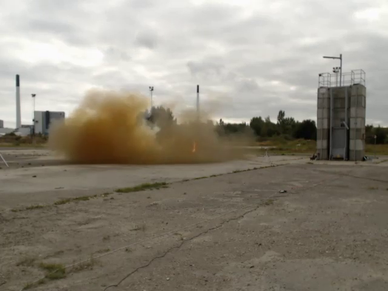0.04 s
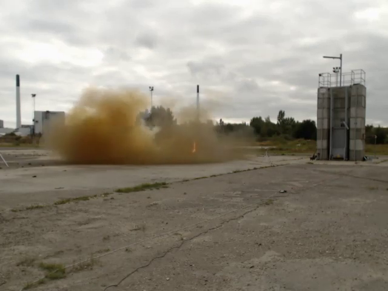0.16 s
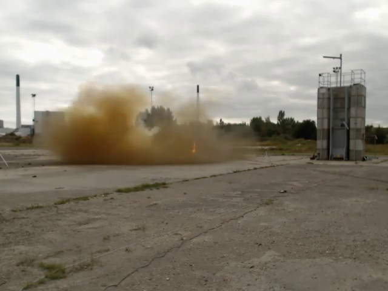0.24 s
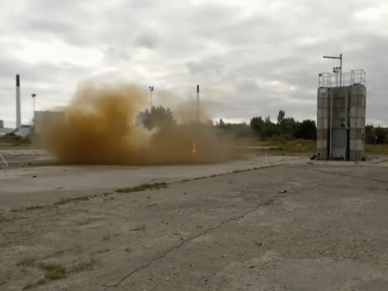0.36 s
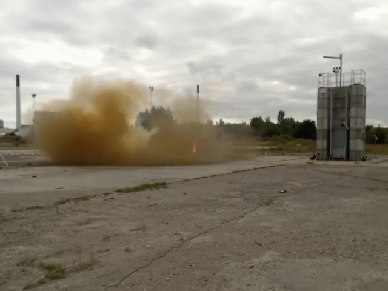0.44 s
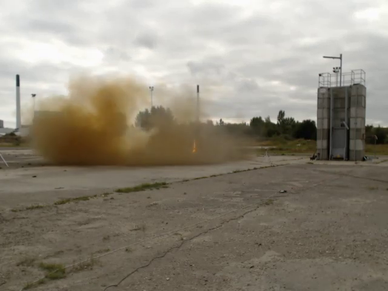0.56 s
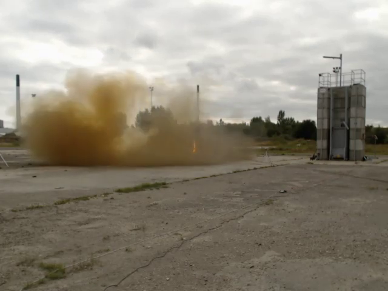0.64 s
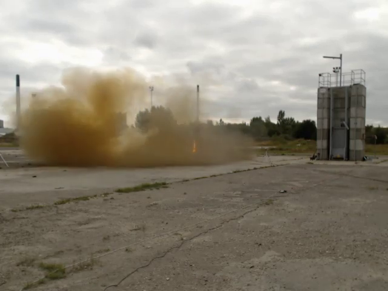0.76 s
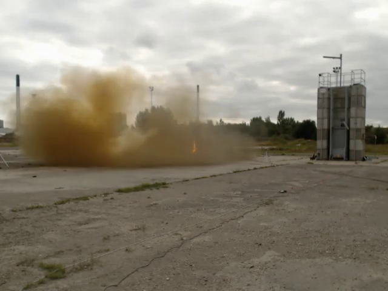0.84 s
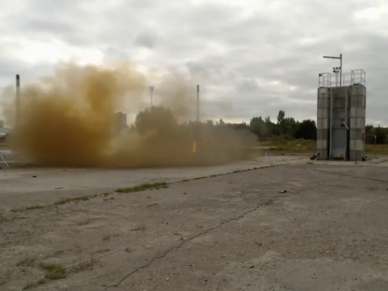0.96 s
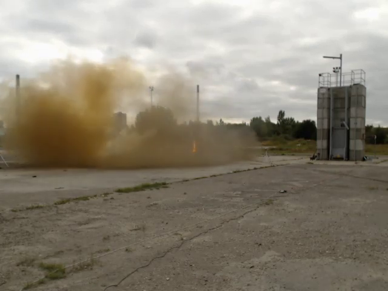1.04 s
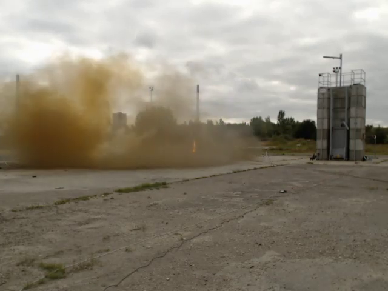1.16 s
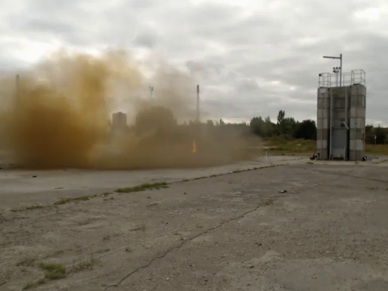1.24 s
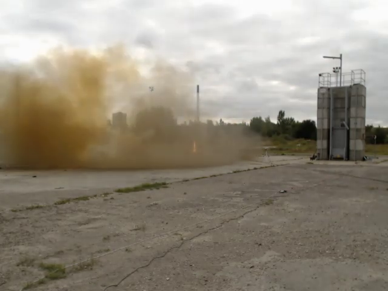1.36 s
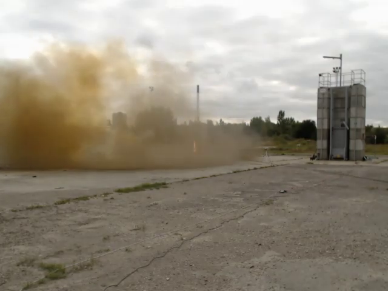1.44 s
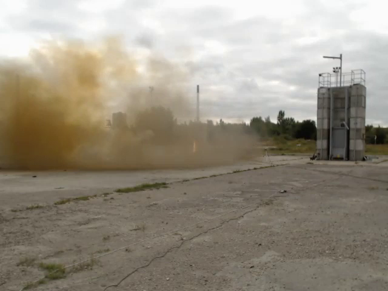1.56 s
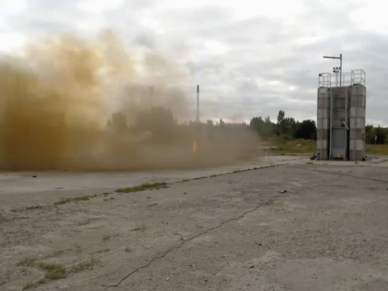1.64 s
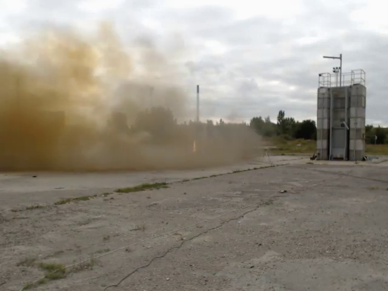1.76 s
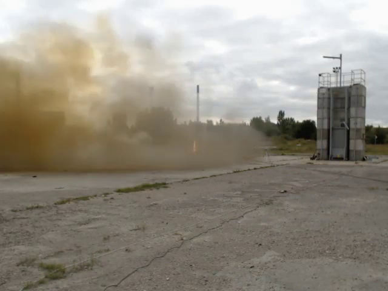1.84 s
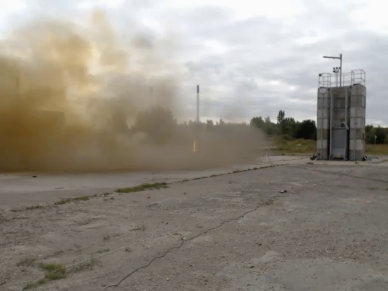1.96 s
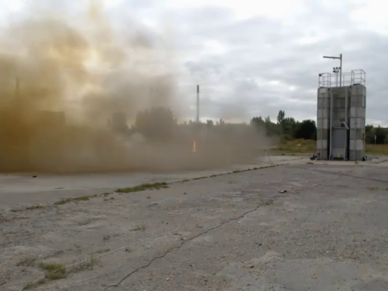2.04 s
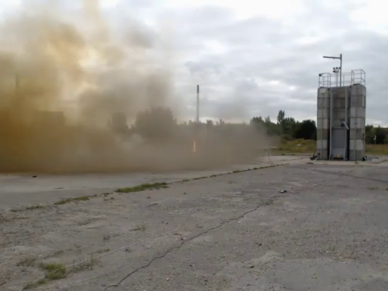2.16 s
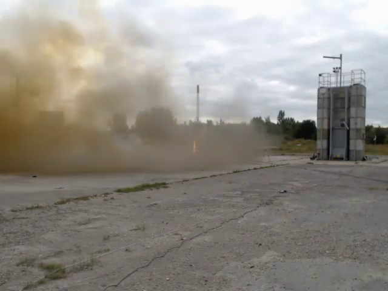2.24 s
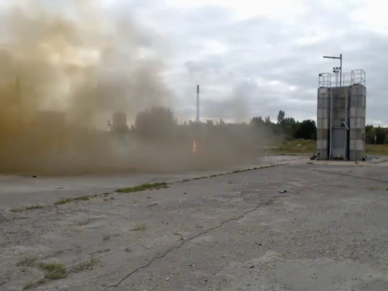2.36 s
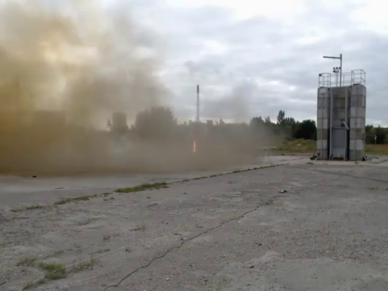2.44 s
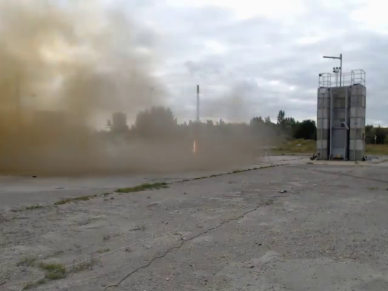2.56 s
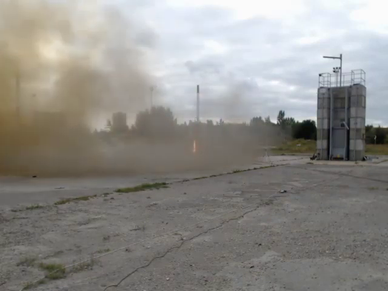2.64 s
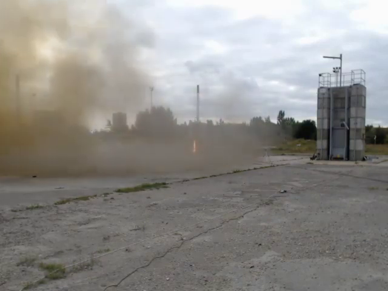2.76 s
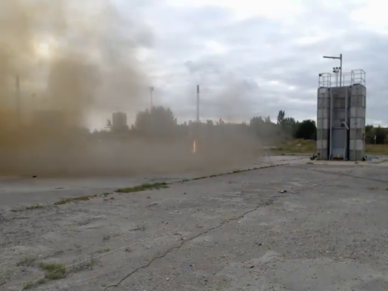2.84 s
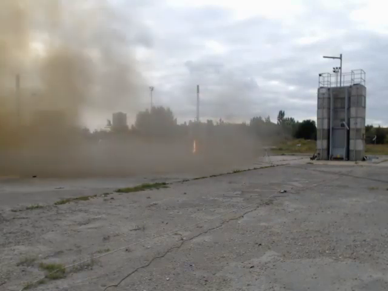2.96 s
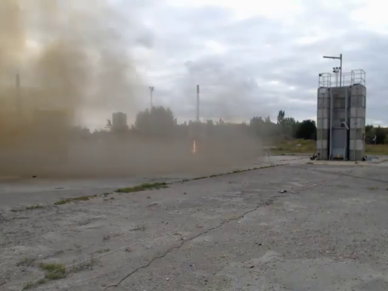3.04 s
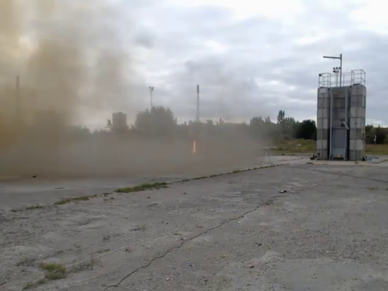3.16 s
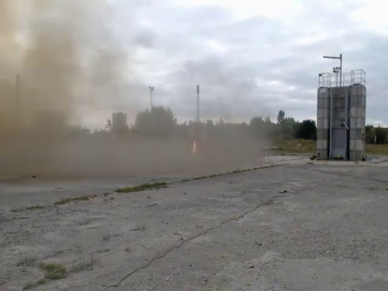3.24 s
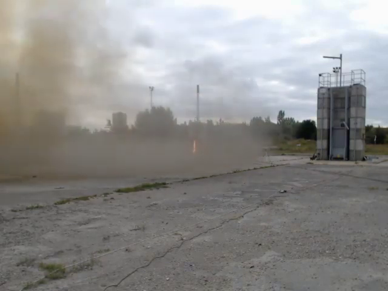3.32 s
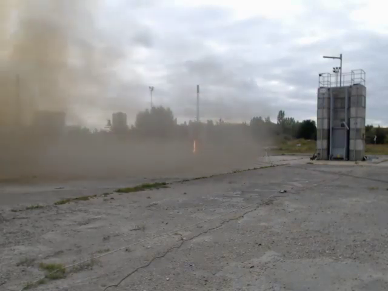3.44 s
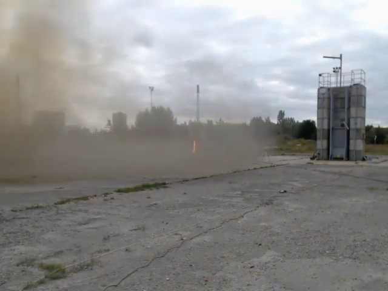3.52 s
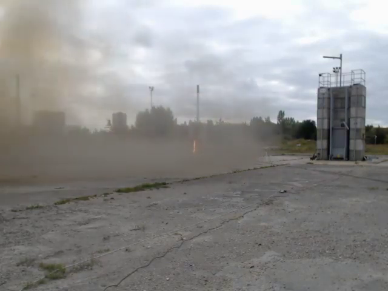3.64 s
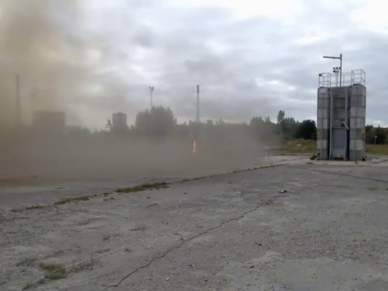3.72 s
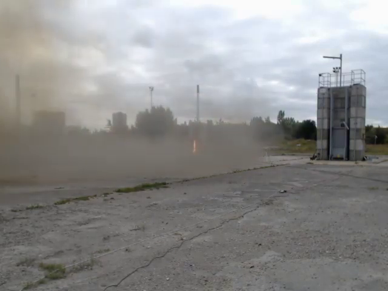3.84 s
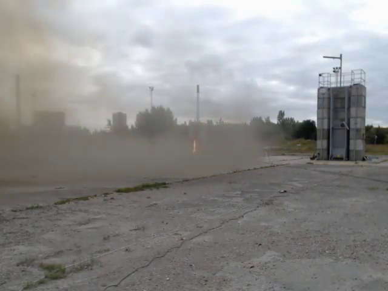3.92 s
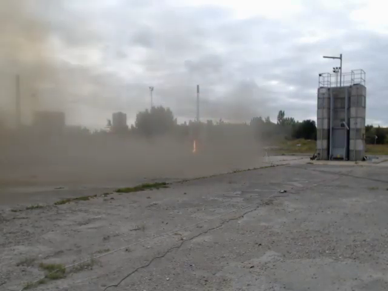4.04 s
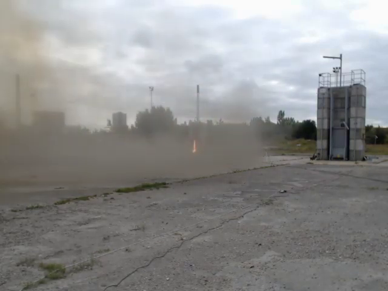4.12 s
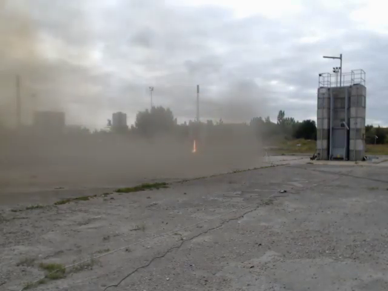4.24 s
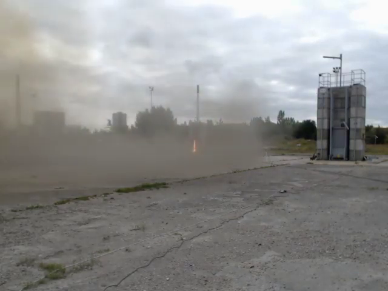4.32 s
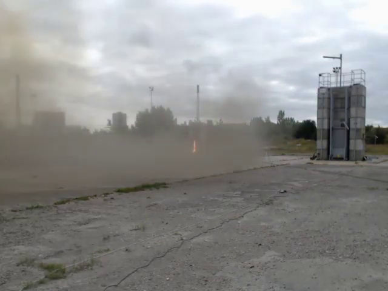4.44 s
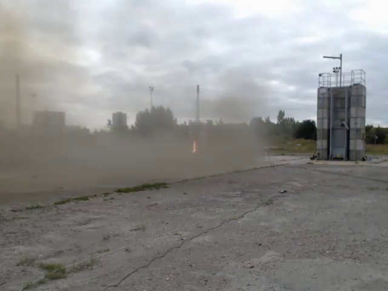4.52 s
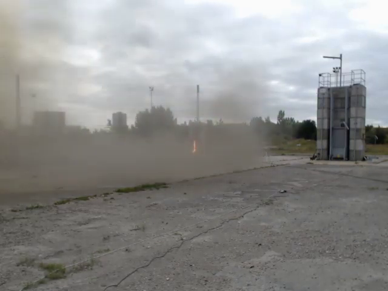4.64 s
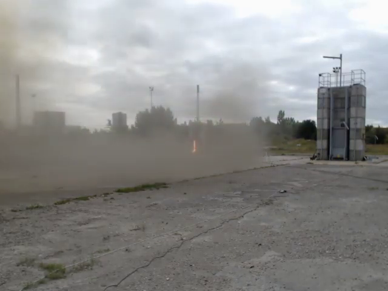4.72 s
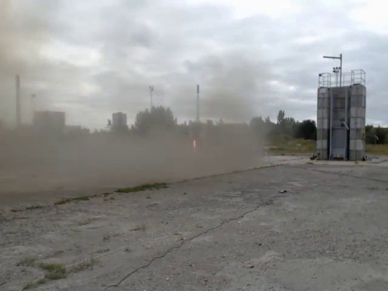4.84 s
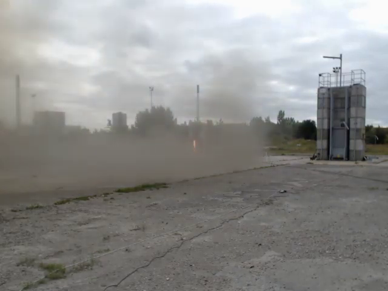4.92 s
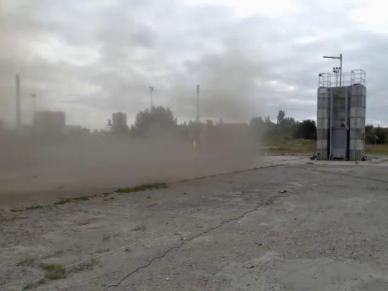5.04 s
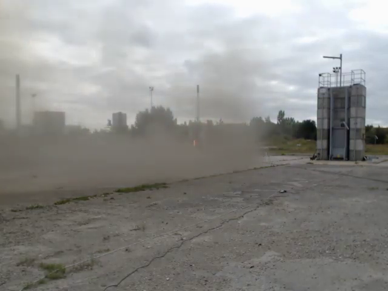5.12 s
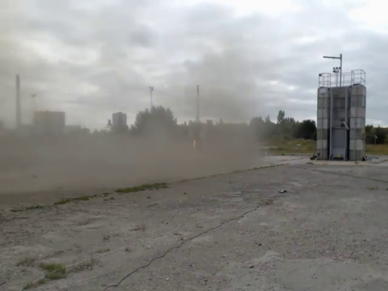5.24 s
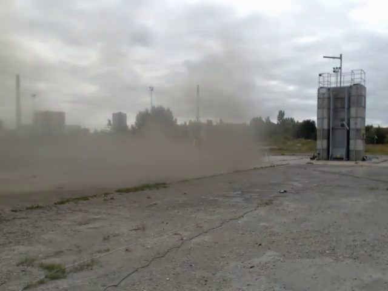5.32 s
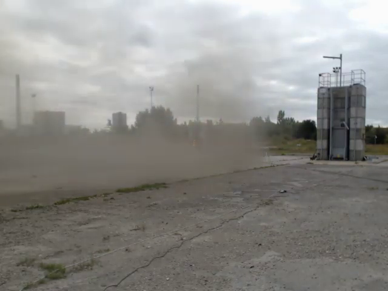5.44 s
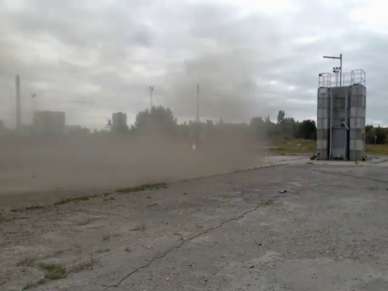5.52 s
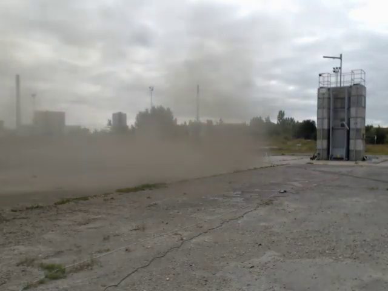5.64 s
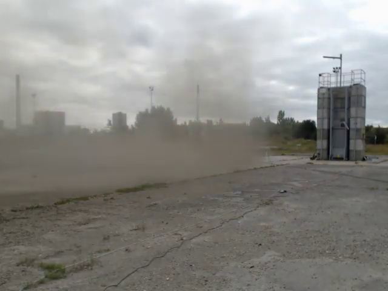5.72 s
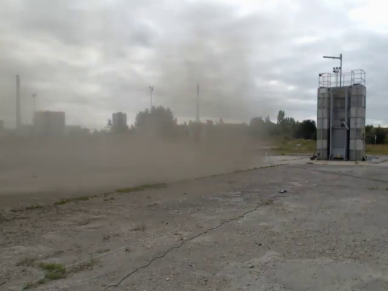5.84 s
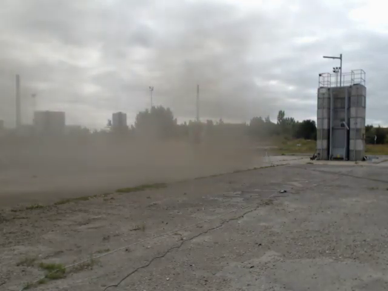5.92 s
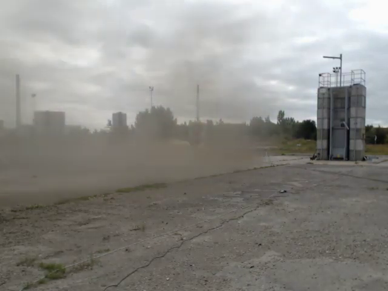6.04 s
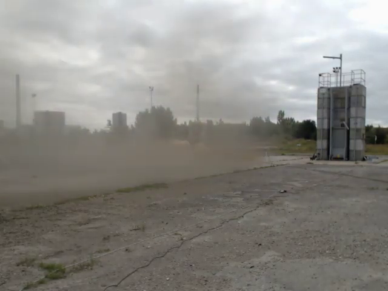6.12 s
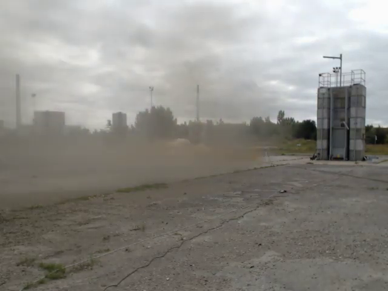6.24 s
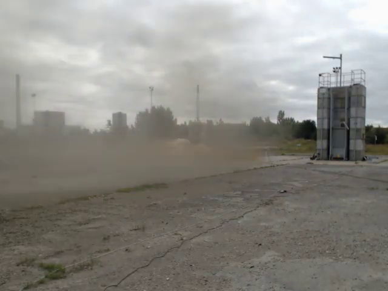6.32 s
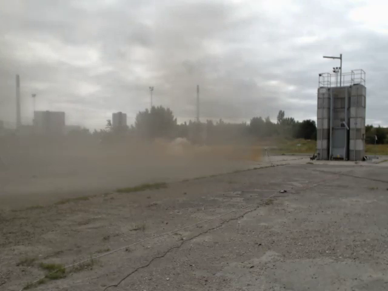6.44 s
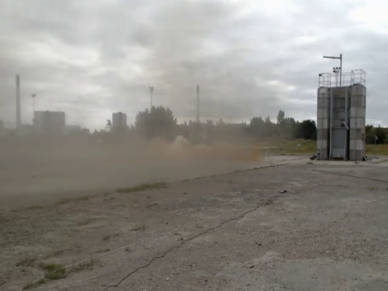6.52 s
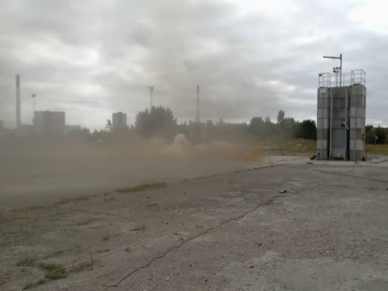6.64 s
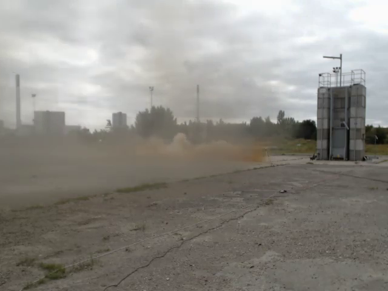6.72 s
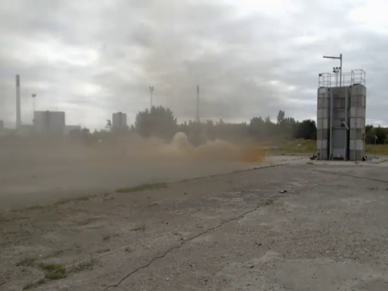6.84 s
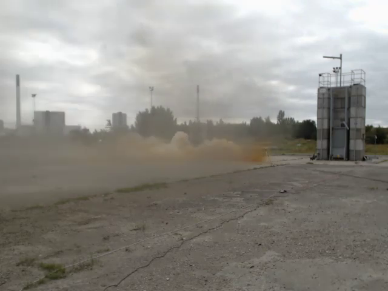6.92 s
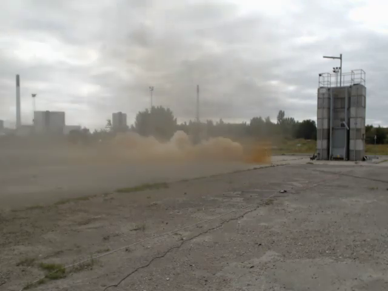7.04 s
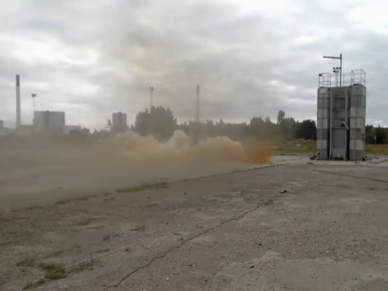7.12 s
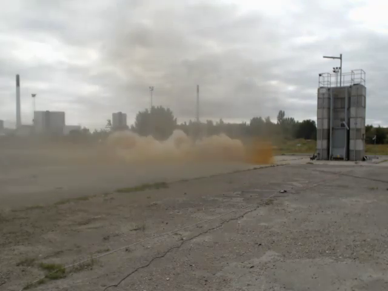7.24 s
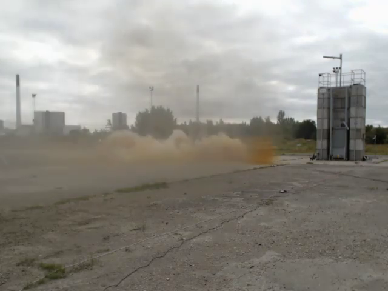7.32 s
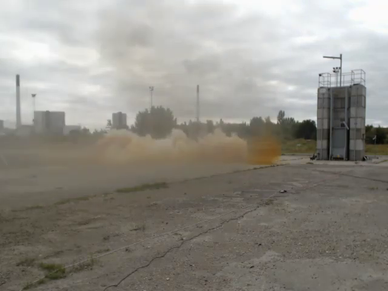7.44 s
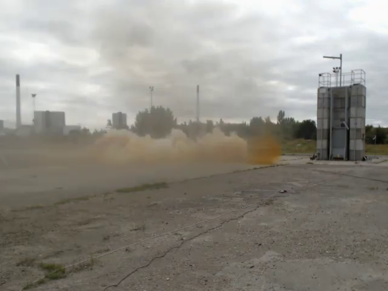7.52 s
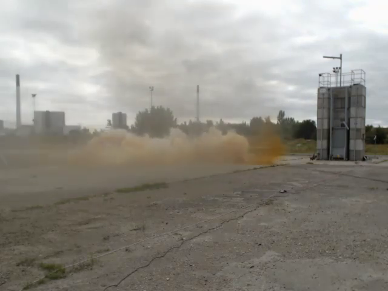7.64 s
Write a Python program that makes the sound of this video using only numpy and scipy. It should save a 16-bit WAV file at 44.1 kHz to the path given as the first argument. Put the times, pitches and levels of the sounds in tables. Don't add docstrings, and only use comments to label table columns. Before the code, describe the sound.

Outdoors, a test-stand rocket blasts dense, continuous noise from the first instant, strong in both low-mid roar and bright hiss. The small camera clips and levels it, leaving the treble patchy and mottled. Hot air makes the tone swirl and flicker, mostly in the first three seconds. The roar then declines smoothly to a quiet, duller rush, with soft evenly spaced ticks. Nearly mono.

```python
import sys
import numpy as np
from scipy import signal
from scipy.fft import rfft, irfft
from scipy.io import wavfile
from scipy.ndimage import uniform_filter1d

SR = 44100
rng = np.random.default_rng(int(sys.argv[2]) if len(sys.argv) > 2 else 0)


def transcribe(u):
    v = np.clip(np.atleast_2d(u).T, -1, 1)
    q = np.round(v * 32767).astype(np.int16)
    wavfile.write(sys.argv[1], SR, q)


N = 338247
FRAME, HOP = 1024, 256

# time_s [s], level_db [dB], treble_loss [dB per octave]
FADE_DUST = [(0, -10, -1.5), (.7, -10.5, -4), (1.25, -10.5, -1.5), (1.44, -12, 1), (1.58, -11.5, 1),
             (2.11, -13, 2.5), (2.65, -14.5, -0.5), (2.82, -16, -1), (3.3, -17.5, 0), (3.42, -16.5, 0.5),
             (3.55, -17.5, 0), (4.55, -21.5, -1), (5.9, -24, 0), (6.55, -25, 0.5), (7.15, -27, 2),
             (7.35, -29, 2), (7.67, -31.5, 3.3)]
# pitch_hz [Hz], level_db [dB per Hz]
JET_SPECTRUM = [(24, -68), (40, -46), (69, -22.5), (154, -6), (202, -5.5), (294, -5), (472, -8.5),
                (576, -11), (1160, -7.5), (1380, -8.5), (2300, -6), (2760, -1.5), (3740, -2), (8100, -13),
                (15500, -29)]
# centre_s [s], pitch_hz [Hz], gain_db [dB], length_s [s]
BROAD = [(0.087, 358, 4.5, 2.6), (0.21, 470, 7, 0.67), (0.39, 1020, 3, 1), (0.44, 143, -27, 0.8),
         (0.49, 610, 3.5, 0.4), (0.874, 240, 9.5, 0.42), (1.516, 676, 4.5, 0.17), (1.558, 4520, 2.5, 1.03),
         (2.2, 1700, 2, 1.1), (1.93, 446, -2, 0.51), (2.09, 180, 6, 2.4), (2.24, 6500, -1, 0.074),
         (2.318, 8000, 0.5, 0.08), (2.496, 337, 7.5, 0.28), (2.832, 430, -5, 0.062), (3.02, 139, 7, 0.61),
         (3.83, 590, 3.5, 1.5), (4.95, 142, 7, 2.1), (5.22, 3570, 1.5, 0.68), (6.05, 554, -4, 0.41),
         (6.3, 111, -16, 0.25), (6.92, 6960, 2.5, 0.97), (7.64, 373, 6, 1.6), (7.66, 684, 4, 0.6)]
# centre_s [s], pitch_hz [Hz], gain_db [dB], length_s [s]
POCKET = [(0.93, 8200, -3, 1), (1.198, 133, -19, 0.21), (1.764, 182, 5, 0.19), (2.58, 570, -4, 0.16),
          (2.74, 110, 4, 0.3), (2.74, 1570, -0.5, 0.16), (2.77, 170, 6, 0.19), (2.94, 294, 6, 0.48),
          (3.553, 2720, -2, 0.19), (3.58, 1400, 3.0, 0.099), (3.61, 400, 4.5, 0.18), (3.68, 230, -8, 0.5),
          (3.75, 830, -5, 0.18), (4.34, 1080, -2.5, 0.18), (4.37, 150, 5, 0.28), (4.9, 1810, -2.0, 0.3),
          (5.08, 1050, -7, 0.12), (5.29, 430, 5.5, 0.41), (5.8, 1520, -7, 0.18), (6.27, 120, -5.5, 0.3)]
# centre_s [s], pitch_hz [Hz], gain_db [dB], length_s [s]
WISP = [(0.0, 3440, 1, 0.06), (0.0, 3490, 1.5, 0.06), (0.0, 6170, -4, 0.08), (0.03, 2120, -4, 0.09),
        (0.08, 1370, -5.2, 0.15), (0.35, 2900, -3.7, 0.13), (0.46, 3890, 1.5, 0.13), (0.71, 8980, -5, 0.16),
        (0.89, 2750, -1.5, 0.2), (0.98, 2000, -2, 0.12), (1.16, 5660, -6, 0.092), (1.2, 2940, -3, 0.08),
        (1.27, 3390, 2, 0.08), (1.32, 6170, -3.1, 0.16), (1.59, 3920, 1.5, 0.08), (1.61, 3340, 1, 0.13),
        (1.7, 2380, -2.8, 0.1), (1.92, 1830, -5, 0.08), (2.05, 3270, 1.5, 0.13), (2.28, 3110, 3, 0.09),
        (2.32, 1850, -1, 0.13), (2.33, 220, -10, 0.1), (2.44, 1500, -4, 0.16), (2.53, 4900, -2, 0.1),
        (2.67, 1700, -3.6, 0.093), (2.72, 1500, -3, 0.1), (2.91, 2450, 1.5, 0.13), (3.11, 3080, 4, 0.09),
        (3.25, 1330, -3.9, 0.12), (3.5, 2380, -1, 0.17), (3.82, 2690, 3.2, 0.12), (4.27, 3020, 2, 0.07),
        (4.48, 2940, 0, 0.09), (4.64, 3810, 3.0, 0.11), (5.39, 3810, 4, 0.09), (5.56, 2770, -3.4, 0.074),
        (5.89, 3300, -1, 0.17), (6.07, 5500, 3, 0.11), (6.25, 2690, -4, 0.11), (6.84, 3110, 2, 0.08),
        (6.93, 3600, -2.8, 0.1), (7.24, 2380, 4, 0.11), (7.38, 2400, 2, 0.19), (7.42, 3390, -4.2, 0.1),
        (7.67, 1430, 8, 0.08)]
# pitch_hz [Hz], width [octaves], gain_db [dB]
BODY = [
    (905, 0.68, 4),
    (1366, 0.14, 5),
    (1825, 0.34, 2.5),
    (2940, 0.59, 1),
    (3800, 0.11, 1),
]
# centre_s [s], pitch_hz [Hz], gain_db [dB], length_s [s], glide [octaves per s]
DRIFT = [(0.28, 1190, 6, 0.4, 1.3), (0.3, 8480, 1.5, 0.66, 1.5), (0.43, 680, 5.0, 0.54, 0.4),
         (0.52, 2570, -5, 0.13, -3), (0.53, 910, 7, 0.64, 0.5), (0.88, 1830, 6, 0.27, 0),
         (1.16, 2400, -5.5, 0.11, 2.5), (1.19, 3360, 2, 0.4, -2), (1.25, 810, -5, 0.81, 0.5),
         (1.4, 6600, 9, 0.05, 2), (1.51, 1330, 7, 0.046, 1), (1.51, 2240, -9, 0.066, -3),
         (1.58, 2740, 6.0, 0.074, -2), (1.67, 4300, 3.5, 0.1, -3), (1.91, 1490, 6.5, 0.4, 0.5),
         (2.32, 1050, 13, 0.082, -2.5), (2.44, 3400, -4.5, 0.46, 0.7), (2.56, 1470, 10, 0.11, -0.5),
         (2.66, 2720, 7, 0.13, -2.5), (2.86, 1300, 4.5, 0.17, 4.5), (3.12, 1330, 8, 0.041, -3),
         (3.47, 1890, -3.5, 0.4, 0), (3.6, 1100, -8, 0.34, 1.1), (3.6, 2940, 3.5, 0.53, 0.5),
         (3.84, 4130, -3, 0.4, -0.5), (4.61, 1460, 4.5, 0.16, 2), (5.34, 1130, -3, 0.55, 0),
         (5.89, 935, 6, 0.39, 2), (6.13, 2180, 6, 0.25, 0), (6.49, 7550, 3, 0.27, 2.5),
         (6.63, 6600, 2.5, 0.6, 0), (6.66, 1180, 3.5, 0.29, -0.5), (7.21, 1040, 6.0, 0.36, 0.5),
         (7.27, 7600, 3.5, 0.4, -1.5), (7.48, 2650, 5, 0.15, 3), (7.53, 670, 4.5, 0.33, 0),
         (7.6, 4360, 2.5, 0.07, -1.5)]
# centre_s [s], pitch_hz [Hz], gain_db
# [dB], length_s [s], glide [octaves per s]
GLINT = [(0.47, 4670, 5.5, 0.2, -0.14), (0.59, 3500, 4.5, 0.097, -0.22), (0.7, 2380, 4, 0.073, 0.7),
         (0.75, 7250, 5.5, 0.092, -0.7), (0.86, 3460, -3.5, 0.37, -0.11), (0.91, 1320, 13, 0.11, 0),
         (1.03, 5240, 5, 0.17, 0.36), (1.06, 600, -18, 0.33, 0.59), (1.11, 1940, 11, 0.08, 0.7),
         (1.16, 1830, -10, 0.05, 0.7), (1.17, 1190, -2.5, 0.98, -0.7), (1.28, 1740, 8.5, 0.18, 0.12),
         (1.31, 2620, 5, 0.11, -0.19), (1.39, 3570, -15, 0.056, 0), (1.43, 8200, -1, 0.9, 0),
         (1.5, 1060, 11, 0.043, 0), (1.51, 1730, -3, 0.27, 1.1), (1.69, 3040, -6, 0.08, 0),
         (1.73, 7340, 4.0, 0.08, -1.5), (1.79, 1285, 12, 0.06, 0.34), (1.8, 2160, 13, 0.096, 1.7),
         (1.83, 990, -2, 0.33, 0), (1.88, 3630, 5, 0.063, 0), (1.92, 3000, -4, 0.49, -0.62),
         (1.93, 4030, -10, 0.064, 0), (1.96, 2750, 9, 0.1, -0.15), (1.99, 2380, 10, 0.16, -1.8),
         (2.0, 5500, -1, 0.12, 0), (2.03, 3560, 2, 0.049, 0.13), (2.11, 1960, 5.5, 0.062, -0.14),
         (2.21, 2450, -7, 0.16, 1.3), (2.21, 4000, 4.5, 0.22, -0.28), (2.26, 1590, -8, 0.27, 1.1),
         (2.29, 1900, 7.5, 0.074, 0), (2.31, 2380, 9, 0.05, 0), (2.39, 770, 9, 0.05, 0),
         (2.45, 1800, 9, 0.05, 0), (2.47, 2610, 10.5, 0.077, 0.5), (2.55, 1010, -8, 0.34, -1.1),
         (2.89, 2500, 5, 0.065, -1.5),
         (2.99, 8230, 1.5, 0.4, 3), (3.06, 6130, 2, 0.44, 2), (3.413, 3270, 7, 0.11, 3.5),
              (3.6, 1630, 6, 0.063, 2), (3.77, 1610, -4, 0.18, -3), (3.79, 2090, 7, 0.05, 4),
              (3.81, 5500, 3.5, 0.2, -1.5), (3.96, 980, 10, 0.071, 3), (3.975, 680, 6.5, 0.18, -0.5),
              (3.995, 2550, 8, 0.043, 6), (4.09, 1350, 2, 0.18, -2), (4.46, 920, 6, 0.12, 1),
              (4.48, 3740, 4, 0.27, -0.5), (4.86, 1950, 6.5, 0.27, 0), (5.227, 1950, -5, 0.35, 2),
              (5.6, 820, 2.5, 0.34, 0), (5.95, 1300, 7, 0.12, -4), (5.98, 4120, -4.0, 0.19, 0),
              (6.03, 5820, -2, 0.6, 0.7), (6.2, 1360, -9, 0.72, 1), (6.22, 4120, 3, 0.08, 0),
              (6.3, 1700, 5, 0.14, -1), (6.35, 5340, 6, 0.12, -3.5), (6.51, 2770, -5, 0.55, 0.5),
              (6.53, 2980, 8, 0.05, 0), (6.57, 1830, -3, 0.18, -1), (6.67, 5400, 2, 0.4, 0),
              (6.68, 3780, -2, 0.34, 0), (6.7, 2060, 6, 0.13, -2), (6.7, 6920, -6.5, 0.073, 4),
              (6.77, 1590, 8, 0.19, -0.7), (6.98, 2160, 5.5, 0.56, -0.5), (7.2, 3320, 5, 0.11, -1),
              (7.22, 1330, -8.0, 0.12, -1), (7.3, 5660, 5, 0.18, -0.7), (7.31, 1730, 8, 0.2, 0),
              (7.5, 2000, 4, 0.39, -1), (7.53, 2800, 3, 0.12, 2), (7.62, 8480, -5, 0.18, -2),
         (2.36, 980, 5, 0.11, -2),
    (6.5, 4200, -1, .1, 0),
    (7.1, 7900, 1, 1.1, 0.5),
    (7, 9100, -1, 1.1, -0.5),
]
# centre_s [s], pitch_hz [Hz], gain_db [dB], length_s [s], glide [octaves per s]
FLICKER = [(0.91, 2260, 7, 0.06, 2), (0.93, 2800, 8, 0.065, 0), (1.08, 3420, 4, 0.09, -2),
           (1.3, 5280, -6, 0.09, 2), (1.46, 5590, -2, 0.2, 2), (1.56, 1710, 8, 0.04, -2),
           (1.59, 2220, 10, 0.04, -2), (1.66, 1570, -12, 0.06, -2), (1.67, 5590, 7, 0.04, -2),
           (1.7, 2090, -5, 0.04, -2), (1.71, 3720, 6, 0.065, 0), (1.73, 2490, 9, 0.04, -2),
           (1.76, 1670, 8.5, 0.085, 0.22), (1.82, 5430, 7, 0.078, -2), (1.85, 2280, 4, 0.04, -2),
           (1.86, 4070, 3, 0.04, -2), (1.92, 1610, -14, 0.06, 0), (1.96, 2030, -6, 0.2, -2),
           (1.98, 2160, 6.0, 0.04, -2), (1.99, 1700, 8, 0.044, -2), (2.03, 4310, 5, 0.04, 0),
           (2.17, 3100, 3.0, 0.14, -1.8), (2.19, 5430, 7, 0.04, 2), (2.3, 4190, -6.5, 0.035, 2),
           (2.34, 3840, 8, 0.04, 2), (2.38, 1520, 6, 0.033, -2), (2.42, 2300, 8, 0.04, 0),
           (2.42, 3230, 7, 0.037, -2), (2.47, 2900, 5, 0.09, 0.22), (2.54, 1730, 6, 0.04, 0),
           (2.57, 2160, -5, 0.14, 0), (2.61, 3360, 7, 0.04, 2), (2.67, 3750, -3.0, 0.2, -1.5),
           (2.68, 2420, 3.5, 0.06, 2), (2.69, 4840, 7, 0.04, -2), (2.81, 1660, 5.0, 0.06, -2),
           (2.81, 3320, 6, 0.04, 2), (2.83, 2220, -9, 0.09, -2)]
# time_s [s], push [ratio], turbulence_depth [ratio]
PUSH = [
    (0, .8, .7),
    (1, .7, 1.2),
    (2.7, .5, 1.2),
    (3.6, .7, .6),
    (6.2, .7, .6),
    (7, .42, .7),
    (7.67, .1, .7),
]
# pitch_hz [Hz], level_db [dB re frame mean]
TREBLE_FLOOR = [
    (7000, -30),
    (9000, -24),
    (12000, -22),
    (15500, -31),
]
# pitch_hz [Hz], level_db [dB re its own band]
GRAIN_FLOOR = [
    (7000, -10.5),
    (9000, -4.4),
    (11500, -.7),
    (15500, .2),
]
THUMP_DB = [6, 7, 4.5, 8, 2, 3, -14, -2, -11, -3, -2, -4, -4, -6, -7, -3, -5, -13, -17, -26, -1, -1, -6,
            -12, 1, -15, -8]
# centre_s [s], low_hz [Hz], high_hz [Hz]
SPLIT = [(0.689, 8930, 10360), (0.803, 5670, 6700), (1.574, 9620, 11010), (2.177, 12360, 15600),
         (2.802, 5700, 6960), (3.036, 4280, 5800), (3.477, 5200, 6310), (3.641, 6260, 7650),
         (3.894, 4260, 6180), (3.94, 5200, 6960), (4.034, 8330, 9800), (4.124, 12460, 13890),
         (4.245, 11730, 13160), (4.265, 4670, 5800), (4.267, 8970, 10410), (4.405, 4710, 6400),
         (4.497, 6910, 7700), (4.544, 7200, 8940), (4.567, 8970, 10360), (4.801, 6860, 8290),
         (4.847, 8500, 9720), (5.24, 9020, 10490), (5.334, 4750, 9590), (5.403, 6910, 8290),
         (5.615, 8930, 9890), (5.75, 14400, 15600), (5.96, 5130, 6370), (6.468, 9150, 10450),
         (7.33, 6220, 7690)]

BROAD_OCT, POCKET_OCT, WISP_OCT = 0.71, 0.46, 0.17
DRIFT_OCT, GLINT_OCT, FLICKER_OCT = 0.35, 0.15, 0.11
BROAD_GAIN, WISP_GAIN = 1.03, 1.1
DRIFT_GAIN, GLINT_GAIN, FLICKER_GAIN = 1.16, 1.12, 1.22
DUST_FROM_HZ = 3430
RUMBLE_HZ, RUMBLE_OCT = 240, 3.35
SHADOW_S, SHADOW_SPAN_S, SHADOW_DB = 0.75, 2.8, -7
LINGER_S, LINGER_SPAN_S, LINGER_DB = 7.12, 1.55, 5.5
FLUTTER_HZ, FLUTTER_OCT, FLUTTER_DB = 3180, 0.62, 1.55
TOP_HZ, TOP_OCT, TOP_LOSS_DB, TOP_LOSS_S = 15500, 0.4, -5, 1.9
DRIVE_START, DRIVE_REST, DRIVE_FALL_S = 1.7, 0.49, 0.92
SEAM_FIRST, SEAM_EVERY = 9464, 12288


def undb(db):
    return 10 ** (np.asarray(db) / 20)


def bell(x, width):
    return np.exp(-4 * np.log(2) * (x / width) ** 2)


def slow_rms(x, span_s):
    return np.sqrt(uniform_filter1d(x ** 2, int(span_s * SR)) + 1e-12)


def shimmer(s, octave, span_s, span_oct):
    rows_per_octave, lowest_octave = 8, 3
    field = rng.standard_normal((96, len(s)))
    for _ in range(2):
        field = uniform_filter1d(field, max(int(span_s * SR / HOP), 1), axis=1)
        field = uniform_filter1d(field, max(int(span_oct * rows_per_octave), 1), axis=0)
    rows = np.clip((octave - lowest_octave) * rows_per_octave, 0, 94.99)
    low = rows.astype(int)
    part = (rows % 1)[:, None]
    return ((1 - part) * field[low] + part * field[low + 1]) / field.std()


def jet(length):
    hz, s, z = signal.stft(rng.standard_normal(length), SR, nperseg=FRAME, noverlap=FRAME - HOP)
    octave = np.log2(np.maximum(hz, 10))
    spectrum_hz, spectrum_db = np.transpose(JET_SPECTRUM)
    db = np.interp(octave, np.log2(spectrum_hz), spectrum_db)[:, None] + 0 * s

    fade_s, _, dust_db = np.transpose(FADE_DUST)
    octaves_in_dust = np.maximum(octave - np.log2(DUST_FROM_HZ), 0)
    db -= np.outer(octaves_in_dust, np.interp(s, fade_s, dust_db))

    rumble_db = SHADOW_DB * bell(s - SHADOW_S, SHADOW_SPAN_S)
    rumble_db += LINGER_DB * bell(s - LINGER_S, LINGER_SPAN_S)
    db += np.outer(bell(octave - np.log2(RUMBLE_HZ), RUMBLE_OCT), rumble_db)

    still = ((BROAD, BROAD_GAIN, BROAD_OCT), (POCKET, 1, POCKET_OCT), (WISP, WISP_GAIN, WISP_OCT))
    for table, gain, width in still:
        for at, hz_mid, gain_db, span in table:
            band = bell(octave - np.log2(hz_mid), width)
            db += gain * gain_db * np.outer(band, bell(s - at, span))

    for hz_mid, width, gain_db in BODY:
        db += gain_db * bell(octave - np.log2(hz_mid), width)[:, None]

    gliding = ((DRIFT, DRIFT_GAIN, DRIFT_OCT), (GLINT, GLINT_GAIN, GLINT_OCT),
               (FLICKER, FLICKER_GAIN, FLICKER_OCT))
    for table, gain, width in gliding:
        for at, hz_mid, gain_db, span, glide in table:
            near = np.abs(s - at) < 2 * span
            track = np.log2(hz_mid) + glide * (s[near] - at)
            band = bell(octave[:, None] - track, width)
            db[:, near] += gain * gain_db * band * bell(s[near] - at, span)

    push_s, _, turbulence = np.transpose(PUSH)
    steadiness = np.interp(hz, [4000, 6000, 10000], [1, .7, .3])
    depth = np.outer(steadiness, np.interp(s, push_s, turbulence))
    db += depth * (1.4 * shimmer(s, octave, .045, .15) + 0.85 * shimmer(s, octave, .025, .5))
    db += depth * 1.6 * shimmer(s, octave, .018, .13)

    flutter_depth = np.interp(s, [1.4, 2, 4, 4.5], [0, 1, 1, .3])
    core = np.outer(bell(octave - np.log2(FLUTTER_HZ), FLUTTER_OCT), flutter_depth)
    db += FLUTTER_DB * core * shimmer(s, octave, .03, .4)
    return signal.istft(z * undb(db), SR, nperseg=FRAME, noverlap=FRAME - HOP)[1][:length]


def overload(x, push, drive):
    x = np.tanh(push * x / slow_rms(x, 0.11))
    x = signal.sosfilt(signal.butter(2, 120, "high", fs=SR, output="sos"), x)
    x = signal.sosfilt(signal.butter(2, 11000, fs=SR, output="sos"), x)
    x = uniform_filter1d(drive, int(.3 * SR)) * x / slow_rms(x, 0.18)
    x = x / (1 + x ** 4) ** .25
    return signal.lfilter([.45, -.9, 1], [1, -.9, .45], x)


def local_power(z, bins):
    return uniform_filter1d(uniform_filter1d(np.abs(z) ** 2, size=bins, axis=0), size=3, axis=1)


def pitted(x):
    hz, s, z = signal.stft(x, SR, nperseg=2048, noverlap=1536)
    top_band = bell(np.log2(hz + 1) - np.log2(TOP_HZ), TOP_OCT)
    z = z * undb(TOP_LOSS_DB * np.outer(top_band, bell(s - s[-1], TOP_LOSS_S)))
    power = local_power(z, 7)
    floor_db = np.interp(hz, *np.transpose(TREBLE_FLOOR), left=-200)
    limit = undb(floor_db)[:, None] ** 2 * power.mean(axis=0)
    jumps = np.repeat(rng.standard_normal(len(s)), 2)[:len(s)]
    limit = limit * undb(3 * jumps)
    return signal.istft(z * np.where(power > limit, 1, .01), SR, nperseg=2048, noverlap=1536)[1][:N]


def sparse(x):
    window = np.sin(np.pi * (np.arange(2048) + .5) / 2048)
    frames = dict(nperseg=2048, noverlap=1536, window=window)
    hz, s, z = signal.stft(x, SR, **frames)
    band = local_power(z, 40)
    limit_db = np.interp(hz, *np.transpose(GRAIN_FLOOR), left=-200)[:, None]
    limit_db = limit_db + np.interp(s, [.5, 1.6], [-3.5, 0])
    z = z * np.where(local_power(z, 4) > band * undb(2 * limit_db), 1, .04)
    z = z * np.sqrt(band / (local_power(z, 40) + 1e-20)).clip(0, 2)
    return signal.istft(z, SR, **frames)[1][:N]


def seams(x, count=14):
    index = np.arange(N)
    ahead = (index + SEAM_EVERY - SEAM_FIRST) // SEAM_EVERY % 2
    return np.pad(x, (0, count), mode="reflect")[index + count * ahead]


def thumps(count=64):
    out = np.zeros(N)
    pulse = np.hanning(count)
    for at, area_db in zip(range(SEAM_FIRST, N, SEAM_EVERY), THUMP_DB):
        out[at:at + count] = pulse / pulse.sum() * undb(area_db)
    return out


def split(x):
    side, size = np.zeros(N), 2048
    hz = np.arange(size // 2 + 1) * SR / size
    envelope = np.exp(-(np.linspace(-1, 1, size) / .5) ** 8)
    for at, low_hz, high_hz in SPLIT:
        start = int(at * SR) - size // 2
        reversed_spectrum = rfft(x[start:start + size][::-1])
        other = reversed_spectrum * ((hz > low_hz) & (hz < high_hz))
        side[start:start + size] += irfft(other) * envelope
    return side * undb(-1.0)


def scene():
    return np.tile(jet(N), (2, 1))


def top_cut(x):
    return signal.sosfilt(signal.butter(12, 15640, fs=SR, output="sos"), x)


def record(dry):
    t = np.arange(N) / SR
    push_s, push, _ = np.transpose(PUSH)
    drive = DRIVE_REST + DRIVE_START * np.exp(-t / DRIVE_FALL_S)
    x = overload(dry[0], np.interp(t, push_s, push), drive)
    x = sparse(pitted(x))
    x = seams(signal.sosfilt(signal.butter(2, 48, "high", fs=SR, output="sos"), x))
    fade_s, level_db, _ = np.transpose(FADE_DUST)
    x = x / slow_rms(x, 0.4) * undb(np.interp(t, fade_s, level_db))
    x = x + thumps()
    side = split(x)
    return top_cut(np.array([x + side, x - side]))


dry = scene()
out = record(dry)
transcribe(out)
```